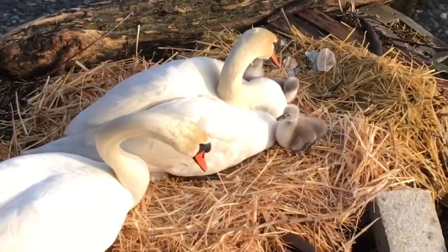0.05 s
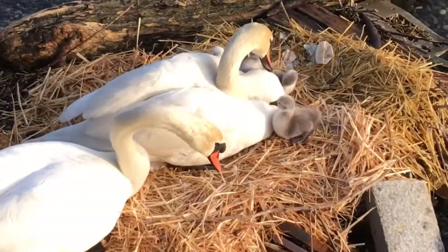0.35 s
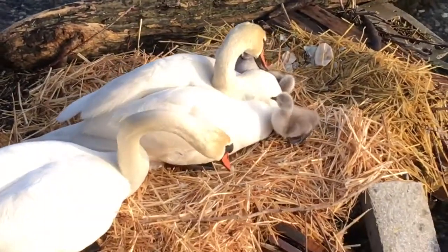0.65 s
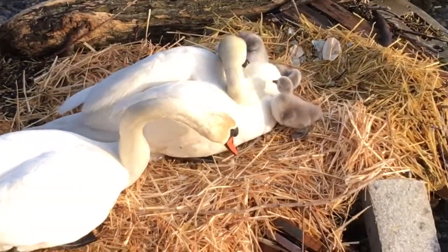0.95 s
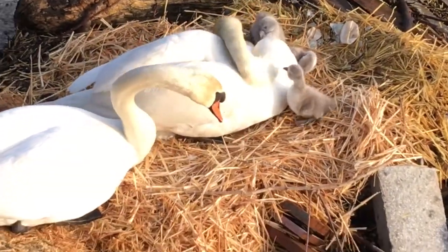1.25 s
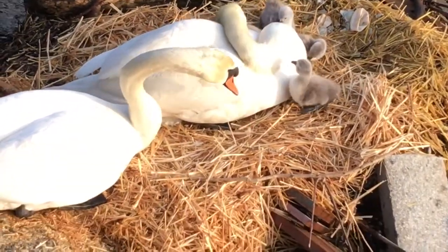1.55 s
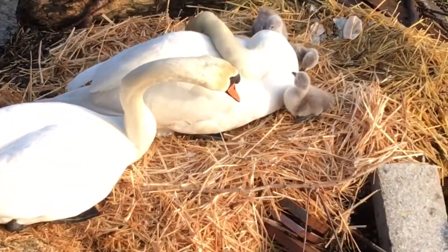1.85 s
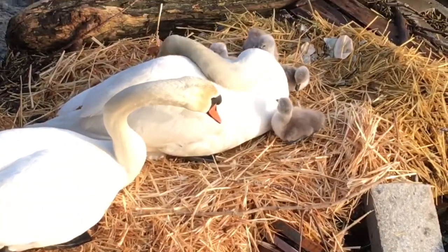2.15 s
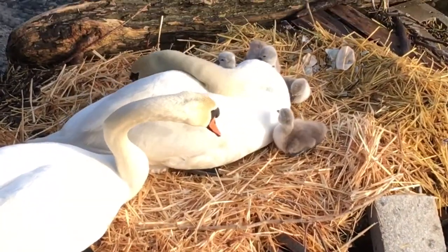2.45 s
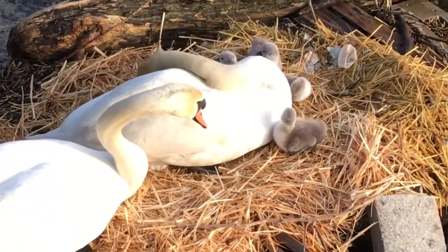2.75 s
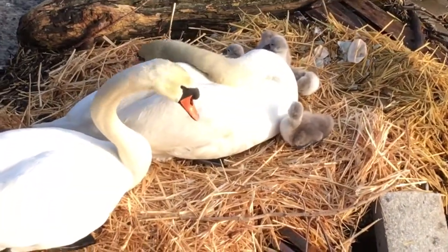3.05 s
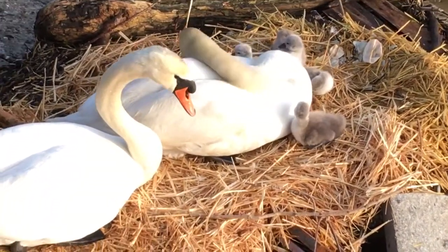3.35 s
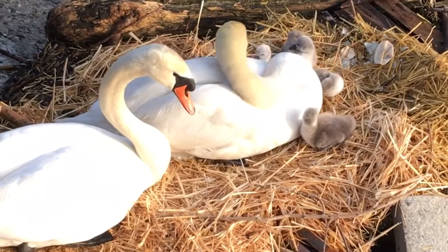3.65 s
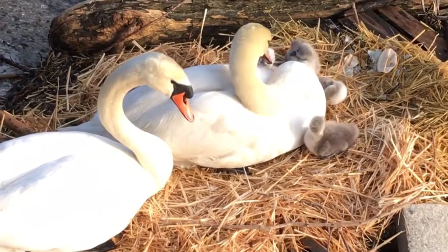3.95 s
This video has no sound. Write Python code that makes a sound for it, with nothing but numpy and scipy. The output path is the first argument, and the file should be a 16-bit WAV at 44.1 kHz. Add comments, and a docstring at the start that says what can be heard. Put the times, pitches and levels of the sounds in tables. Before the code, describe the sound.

Baby swans give two high, whistling peeps and later a weaker one, on a nest by the water. Nearby straw crackles and rustles with a few tiny water plips, while a distant engine, songbirds and soft wind sit behind.

```python
"""On a straw nest beside the water, cygnets peep three times: thin whistles that climb, arch and drop,
each a nearly pure tone with two weak overtones. As the swans shift and preen, dry stalks snap and
rustle (impulses exciting damped resonances), feathers brush and the nest gives soft knocks.
Ringing bubbles make a few small plips. Far off, under light wind, a songbird sings over a faint
chorus and an engine drones on a few spectral lines."""
import sys
import numpy as np
from scipy import signal
from scipy.fft import rfft, irfft
from scipy.io import wavfile
from scipy.ndimage import uniform_filter1d

SR = 44100
rng = np.random.default_rng(int(sys.argv[2]) if len(sys.argv) > 2 else 0)


def pcm_store(signal):
    """Save signal as 16-bit PCM."""
    levels = np.round(np.clip(np.atleast_2d(signal), -1, 1) * 32767)
    wavfile.write(sys.argv[1], SR, levels.astype(np.int16).T)


N = 176400
T = np.arange(N) / SR


def from_db(db):
    """Amplitude ratio of a level."""
    return 10 ** (np.asarray(db) / 20)


def unit_rms(x):
    """Normalisation to unit power."""
    return x / np.sqrt(np.mean(x ** 2) + 1e-20)


def in_time(rows):
    """Linear interpolation of each column at every sample."""
    times, *columns = np.transpose(rows)
    return [np.interp(T, times, column) for column in columns]


def at_hz(spectrum, hz):
    """Interpolation of a spectrum on a log-frequency axis."""
    f, db = np.transpose(spectrum)
    return np.interp(np.log(hz), np.log(f), db)


def drift(corner_hz):
    """Random modulation: low-passed noise of unit rms."""
    hop, settle = 40, 2000   # samples per step, steps discarded
    pole = np.exp(-2 * np.pi * corner_hz * hop / SR)
    white = rng.standard_normal(N // hop + settle + 2)
    slow = signal.lfilter([1], [1, -2 * pole, pole * pole], white)[settle:]
    return np.interp(np.arange(N) / hop, np.arange(len(slow)), unit_rms(slow))


def band(x, low, high):
    """Butterworth band-pass filter."""
    sos = signal.butter(2, [low, min(high, .45 * SR)], "band", fs=SR, output="sos")
    return signal.sosfilt(sos, x)


def phase_of(hz):
    """Phase is the time integral of frequency."""
    return 2 * np.pi * np.cumsum(hz) / SR


def decay(t, t60):
    """Exponential damping: 60 dB down after t60 seconds."""
    return np.exp(-np.log(1000) * t / t60)


def ring(clicks, hz, t60):
    """Damped resonator: each impulse excites a decaying sine."""
    r, w = decay(1 / SR, t60), 2 * np.pi * hz / SR
    return signal.lfilter([0, np.sin(w)], [1, -2 * r * np.cos(w), r * r], clicks + 1e-18)


def add(out, start, sound):
    """Superposition of a sound from a start time in seconds."""
    i = max(int(start * SR), 0)
    out[i:i + len(sound)] += sound[:N - i]


def banded_noise(spectrum, flicker_db):
    """Noise of unit rms in third-octave bands, each independently amplitude-modulated."""
    edges = 22 * 2 ** (np.arange(30) / 3)
    out, white = 0, rng.standard_normal((2, N + SR // 4))
    for k, (low, high) in enumerate(zip(edges, edges[1:])):
        db = at_hz(spectrum, np.sqrt(low * high)) + flicker_db * drift(3.5)
        if spectrum[0][0] < high and low < spectrum[-1][0]:
            out = out + from_db(db) * band(white[k % 2], low, high)[-N:]
    return unit_rms(out)


def scattered(x, t60):
    """Diffuse scattering: convolution with decaying noise of unit energy."""
    echoes = rng.standard_normal(SR) * decay(T[:SR], t60)
    return signal.fftconvolve(x, echoes / np.linalg.norm(echoes))[:N]


# Spectra of wind rumble, outdoor hiss and breeze: f/Hz, relative spectral density/dB
RUMBLE_SPECTRUM = [(25, -20), (33, -8), (45, -0.5), (65, -2), (90, -2), (130, -4.5), (190, -15), (260, -20),
                   (400, -31.5)]
AIR_SPECTRUM = [(300, 3.5), (500, -0.5), (1000, 0), (2000, -4.5), (2800, -9.5), (3400, -4.5), (4500, -14),
                (5500, -14), (9500, -20), (10500, -18), (16000, -22)]
BREEZE_SPECTRUM = [(250, 12), (450, 2.5), (700, 3), (1300, 1.5), (2000, -1.5), (3000, -17.5), (6000, -50)]
# Swell of the breeze: t/s, level/dB
BREEZE_ENVELOPE = [(0, -90), (1.4, -75), (2.4, -68), (3.05, -73), (3.5, -68.5), (4, -66.5)]

def wind():
    """Broadband noise: low rumble, an even hiss and a slowly rising breeze."""
    rumble = from_db(-53) * banded_noise(RUMBLE_SPECTRUM, flicker_db=.7)
    air = from_db(-71) * banded_noise(AIR_SPECTRUM, flicker_db=.25)
    breeze = from_db(in_time(BREEZE_ENVELOPE)[0]) * banded_noise(BREEZE_SPECTRUM, flicker_db=.5)
    return rumble + air + breeze


# Course of the drone: t/s, f/Hz of the strongest line, reference level/dB
ENGINE_COURSE = [(0, 73.4, -52), (.28, 73.1, -59), (.75, 78.86, -51.5), (1.2, 81.15, -51),
                 (1.8, 82.24, -57), (2.15, 82.1, -47.5), (2.6, 80.4, -50), (3.2, 79.9, -46),
                 (3.65, 80.53, -49), (4, 81, -44.5)]
# Its lines: frequency ratio to the strongest, level/dB re the reference
ENGINE_LINES = [(1, 0.5), (1.5, -12), (2, -21.5), (2.5, -23.5), (3, -26.5), (8, -33.5)]
# A thin rising hum: t/s, f/Hz, level/dB
RISING_HUM = [(0, 280, -92), (1.8, 288, -80), (2.4, 297, -68.5), (2.8, 303.2, -75), (4, 320.3, -71.5)]
# A hum that comes and goes: t/s, level/dB
HUM_ENVELOPE = [(0, -67.5), (.35, -73.5), (.75, -65), (1.6, -70.5), (2.9, -82.5), (3.5, -65), (4, -68.5)]

def engine(wander=.00692, hum_hz=198.7):
    """Line spectrum of a far engine drawing nearer: separately wavering partials and two faint hums."""
    hz, db = in_time(ENGINE_COURSE)
    phase = phase_of(hz * (1 + wander * drift(5)))
    drone = np.zeros(N)
    for ratio, line_db in ENGINE_LINES:
        drone += from_db(db + line_db + 1.6 * drift(5.5)) * np.sin(ratio * phase)
    for hz, db in (in_time(RISING_HUM), (hum_hz, in_time(HUM_ENVELOPE)[0])):
        amplitude = from_db(db + 3 * drift(9.3))
        drone += amplitude * np.sin(phase_of(hz * (1 + wander * drift(7.2))))
    return np.sqrt(2) * drone


# Blurred song of distant birds: f/Hz, relative spectral density/dB
CHORUS_SPECTRUM = [(2700, -21.5), (3270, 0.5), (3900, -14), (4550, -4), (5000, -22)]
# Its rise and fall: t/s, level/dB
CHORUS_ENVELOPE = [(.4, -84), (.85, -78), (1.4, -82), (2.7, -83), (3.1, -102), (3.65, -80.5)]

def chorus(flutter_db=4.5):
    """Incoherent superposition: distant birds merge into a narrow, fluttering band of noise."""
    hz = np.maximum(np.arange(N // 2 + 1) * SR / N, 1)
    blur = irfft(rfft(rng.standard_normal(N)) * from_db(at_hz(CHORUS_SPECTRUM, hz)), N)
    blur = unit_rms(band(blur, CHORUS_SPECTRUM[0][0], CHORUS_SPECTRUM[-1][0]))
    return from_db(in_time(CHORUS_ENVELOPE)[0] + flutter_db * drift(6)) * blur


# The songbird's falling syllable: t/s from its onset, f/Hz, relative level/dB
SYLLABLE_CONTOUR = [(0, 5608, -4), (.018, 5445, 0), (.033, 4000, 1.5), (0.047, 4580, 3), (.072, 3885, 0.5),
                    (0.091, 3230, 9), (.135, 3140, -15)]
# Its repeats: t/s, level/dB before path loss
SYLLABLE_ONSETS = [(0.436, -77), (.582, -77), (.727, -76)]
# Slurred notes: t/s, duration/s, start f/Hz, end f/Hz, level/dB before path loss
SLURS = [(0.058, 0.047, 4260, 3120, -71), (0.18, 0.061, 5190, 5610, -75), (0.886, .028, 3690, 5060, -69),
         (0.905, 0.083, 4400, 3240, -73.5), (1.045, 0.023, 3740, 4830, -69.5),
         (1.07, 0.057, 4460, 3130, -70), (1.527, 0.025, 5530, 4210, -70.5), (1.675, 0.18, 4770, 3356, -71),
         (2.432, .07, 5000, 3600, -76), (2.666, 0.14, 5036, 4060, -74)]

def songbird(flutter_db=4.5, direct_db=-4, echo_db=-6.5):
    """Frequency-modulated tones arrive by a direct path and as a smear of scattered echoes."""
    song, warble = np.zeros(N), drift(160)
    for start, db in SYLLABLE_ONSETS:
        hz, shape_db = in_time([(start + after, f, level) for after, f, level in SYLLABLE_CONTOUR])
        sounding = (T > start) & (T < start + SYLLABLE_CONTOUR[-1][0])
        gate = uniform_filter1d(sounding.astype(float), size=200)
        amplitude = np.sqrt(2) * from_db(db + shape_db + flutter_db * drift(43))
        song += gate * amplitude * np.sin(phase_of(hz * (1 + .01974 * warble)))
    for start, length, start_hz, end_hz, db in SLURS:
        progress = np.clip((T - start) / length, 0, 1)
        hz = start_hz * (end_hz / start_hz) ** progress * (1 + .04 * warble)
        swell = np.sqrt(2 * np.abs(np.sin(np.pi * progress)))
        song += from_db(db) * swell * np.sin(phase_of(hz))
    return from_db(direct_db) * song + from_db(echo_db) * scattered(song, t60=.44)


# Bubbles: t/s, initial f/Hz, level/dB before attack and damping, T60/s
BUBBLES = [(0.286, 1530, -45, 0.017), (0.365, 1870, -50, 0.033), (1.719, 1870, -51, 0.044),
           (2.228, 1060, -50.5, 0.042)]

def water(attack_s=.004, rise_per_s=1.1):
    """Bubble resonance: each plip is a damped oscillation of rising frequency."""
    out, t = np.zeros(N), T[:SR // 10]
    for start, hz, db, t60 in BUBBLES:
        phase = 2 * np.pi * hz * (t + rise_per_s * t ** 2 / 2)
        envelope = np.minimum(t / attack_s, 1) * decay(t, t60)
        add(out, start, from_db(db) * envelope * np.sin(phase))
    return out


# A neck sliding over feathers: t/s, level/dB
BRUSH_ENVELOPE = [(2.38, -110), (2.47, -73), (2.7, -78), (2.95, -85), (3.1, -110)]
# Hiss of the feathers: f/Hz, relative spectral density/dB
FEATHER_SPECTRUM = [(1200, -6), (4500, 3), (7000, -8), (15000, -19)]

def preening():
    """Friction noise: feathers brush smoothly over each other."""
    return from_db(in_time(BRUSH_ENVELOPE)[0]) * banded_noise(FEATHER_SPECTRUM, flicker_db=.8)


# Dull knocks in the nest: t/s, centre f/Hz, peak level/dB
NEST_KNOCKS = [(.287, 860, -52), (.298, 412, -51.5), (.842, 355, -48), (0.842, 910, -52.5),
               (1.37, 920, -58.5)]

def knocks(edge_ratio=1.74):
    """Heavily damped impacts: soft contacts give short, pitchless puffs of noise."""
    out, t = np.zeros(N), T[:SR // 10]
    for start, hz, db in NEST_KNOCKS:
        burst = rng.standard_normal(len(t)) * decay(t, t60=.025)
        puff = band(burst, hz / edge_ratio, hz * edge_ratio)
        add(out, start, from_db(db) * puff / np.abs(puff).max())
    return out


# Strength of the stalk resonances: f/Hz, relative level/dB
STRAW_SPECTRUM = [(1000, -14), (3500, -2), (6000, 2), (9000, 1.5), (15000, -32)]
# A bird moving on the straw: t/s, duration/s, level/dB, spectral tilt/(dB per octave)
MOVEMENTS = [(1.614, 0.12, -78, -2), (1.737, 0.084, -80, -5), (2.078, 0.04, -68, -0.5),
             (2.107, 0.12, -73.5, -3), (3.44, 0.099, -72, -2)]

def rustle(contacts_per_s=1700, spread_db=4, ring_cycles=11, rest_db=-83.5):
    """Shot noise of tiny stalk contacts swells as a bird moves: dull if crushed, bright if brushed."""
    sizes = from_db(spread_db * np.minimum(rng.exponential(1, N), 4)) * rng.choice([-1, 1], N)
    clicks = sizes * (rng.random(N) < contacts_per_s / SR)
    stalk_hz = np.geomspace(1200, 14500, 24)
    struck = rng.integers(0, len(stalk_hz), N)
    stalks = np.array([
        from_db(at_hz(STRAW_SPECTRUM, hz)) * ring(clicks * (struck == k), hz, ring_cycles / hz)
        for k, hz in enumerate(stalk_hz)])
    out = from_db(rest_db) * unit_rms(stalks.sum(axis=0))
    octaves = np.log2(stalk_hz / stalk_hz[0])
    for start, length, db, tilt_db in MOVEMENTS:
        progress = np.clip((T - start) / length, 0, 1)
        swell = np.sqrt(np.abs(np.sin(np.pi * progress)))
        out += from_db(db) * swell * unit_rms(from_db(tilt_db * octaves) @ stalks)
    return out


# Breaking stalks: t/s, ring f/Hz, ring level/dB, crack peak level/dB before crack_trim_db
STALK_BREAKS = [(.066, 4230, -57, -58), (.205, 3200, -59, -65), (.261, 8000, -64, -59),
                (.3535, 7540, -58, -46), (.364, 6850, -63, -56), (.37, 3700, -52, -49),
                (1.289, 6240, -62, -47.5), (1.373, 3450, -56.5, -66), (1.399, 6980, -65, -60),
                (1.411, 3160, -56.5, -64), (1.635, 2280, -54.5, -58), (1.658, 2800, -57, -64),
                (1.671, 2130, -53, -66), (1.683, 1810, -50.5, -50), (1.718, 2000, -43.5, -44.5),
                (1.741, 8500, -63, -66), (1.7599, 4240, -59, -41), (1.769, 9400, -58, -62),
                (1.784, 8400, -62, -55), (1.817, 4960, -58, -45), (2.086, 1450, -55, -49),
                (2.093, 1970, -49, -60), (2.107, 5970, -55, -67), (2.125, 3080, -54, -56),
                (2.1475, 2400, -54.5, -65), (2.17, 5357, -56.5, -65), (2.193, 6850, -61.5, -55),
                (2.219, 1950, -56, -66), (2.242, 4253, -55, -38.5), (2.3546, 3980, -51.5, -49),
                (2.402, 6946, -65, -51), (3.46, 3100, -52, -61), (3.469, 4900, -55.5, -53)]

def snaps(crack_t60=.0043, crack_trim_db=-3, splinter_db=-20):
    """Brittle fracture: a brief crack, three small splinters and the damped ring of the stalk."""
    out, t = np.zeros(N), T[:SR // 20]
    for start, hz, ring_db, crack_db in STALK_BREAKS:
        delays_s = rng.exponential(.004, size=3)
        splinters = sum((t > delay) * decay(np.abs(t - delay), crack_t60) for delay in delays_s)
        envelope = decay(t, crack_t60) + from_db(splinter_db) * splinters
        crack = band(rng.standard_normal(len(t)) * envelope, .55 * hz, 11800)
        crack /= np.abs(crack).max()
        stalk = np.sin(2 * np.pi * hz * t) * decay(t, t60=.01)
        add(out, start, from_db(ring_db) * stalk + from_db(crack_db + crack_trim_db) * crack)
    return out


# Fundamental of the whistle, one contour per peep: t/s, f/Hz, level/dB
PEEP_CONTOURS = [
    [(.226, 1590, -70), (.238, 1810, -58), (.258, 2070, -67), (.28, 2260, -69), (.315, 2240, -66),
     (.335, 2417, -59), (.348, 2657, -59), (.366, 2640, -51), (.382, 2570, -62.5), (.402, 2060, -64),
     (.418, 1620, -70)],
    [(1.093, 1447, -68), (1.113, 1640, -61.5), (1.128, 1900, -72), (1.165, 2046, -68.5),
     (1.183, 2214, -57.5), (1.195, 2404, -66.5), (1.21, 2683, -55.5), (1.23, 2667, -55), (1.256, 2626, -56),
     (1.271, 2260, -59), (1.286, 1520, -67)],
    [(3.115, 1906, -80), (3.135, 2210, -74), (3.148, 2420, -86), (3.165, 2550, -75.5), (3.2, 2650, -75.5),
     (3.23, 2953, -77), (3.26, 2970, -72), (3.285, 2913, -74), (3.297, 2600, -82)],
]
# Timbre per peep: 2nd and 3rd harmonic level/dB re fundamental, roughness (0-1), greatest fade/dB
PEEP_TIMBRES = [(-21, -19.5, 0.08, 12), (-19.5, -21.5, 0.13, 13.5), (-9.5, -28, 0.22, 3)]
# Beak opening on the climb, per peep: multiplier of BEAK_DB
BEAK_OPENINGS = [.5, 1.82, .1]
# Voice breaks on the first two climbs: t/s, half-duration/s
VOICE_BREAKS = [(0.333, 0.0033), (1.189, 0.0061)]
BEAK_HZ, BEAK_HALF_WIDTH_HZ, BEAK_DB = 4000, 290, 19.5
JITTER, SHIMMER_DB = .057, 15   # random pitch and level spread at roughness 1

def cygnets(fade_db_per_octave=130, break_jitter=.0576, rasp_depth=.13):
    """Source and filter: a whistle gains overtones atop its arch; a beak resonance colours its climb."""
    out = np.zeros(N)
    breaking = sum(np.exp(-((T - centre) / half) ** 2) for centre, half in VOICE_BREAKS)
    for contour, timbre, opening in zip(PEEP_CONTOURS, PEEP_TIMBRES, BEAK_OPENINGS):
        second_db, third_db, roughness, max_fade_db = timbre
        hz, db = in_time(contour)
        hz = uniform_filter1d(hz, size=400)
        climbing = T < T[np.argmax(hz)]
        fade_db = np.minimum(fade_db_per_octave * np.log2(hz.max() / hz), max_fade_db)
        hz = hz * (1 + (JITTER * roughness + break_jitter * breaking) * drift(232))
        phase = phase_of(hz)
        tone = np.sin(phase)
        for k, overtone_db in ((2, second_db), (3, third_db)):
            detuning = (k * hz - BEAK_HZ) / BEAK_HALF_WIDTH_HZ
            boost_db = climbing * opening * BEAK_DB / (1 + detuning ** 2)
            tone += from_db(overtone_db + boost_db - fade_db) * np.sin(k * phase)
        inside_s = np.minimum(T - contour[0][0], contour[-1][0] - T)
        gate = np.clip(inside_s / .0036 + .5, 0, 1)   # 3.6 ms edges
        rasp = 1 + rasp_depth * unit_rms(band(rng.standard_normal(N), 46.6, 466))
        amplitude = np.sqrt(2) * from_db(db + SHIMMER_DB * roughness * drift(87))
        out += gate * rasp * amplitude * tone
    return out + from_db(-14.5) * scattered(out, t60=.09)   # scatter from the straw and the bank


def scene():
    """Superposition of the nest and its surroundings in one channel."""
    nest = cygnets() + snaps() + rustle() + knocks() + preening()
    return (nest + water() + songbird() + chorus() + engine() + wind())[None]


def record(dry, low_cut_hz=38.3, high_cut_hz=15900):
    """Band limiting: steep filters remove the deepest rumble and the highest treble."""
    high_pass = signal.butter(10, low_cut_hz, "high", fs=SR, output="sos")
    low_pass = signal.ellip(10, .1, 70, high_cut_hz, fs=SR, output="sos")
    return signal.sosfilt(low_pass, signal.sosfilt(high_pass, dry))


dry = scene()
out = record(dry)
pcm_store(out)
```